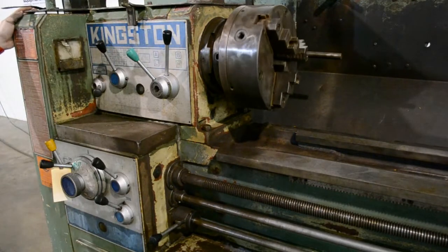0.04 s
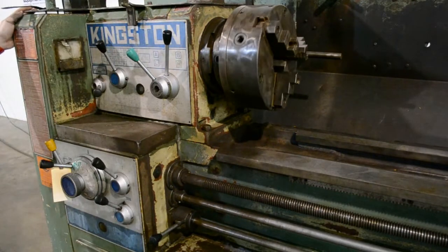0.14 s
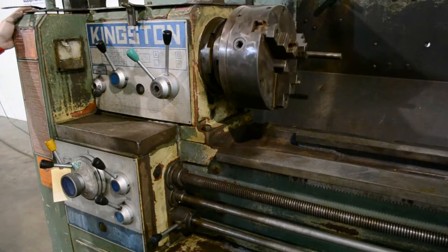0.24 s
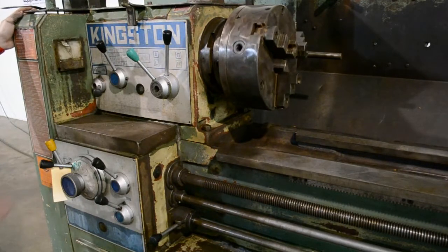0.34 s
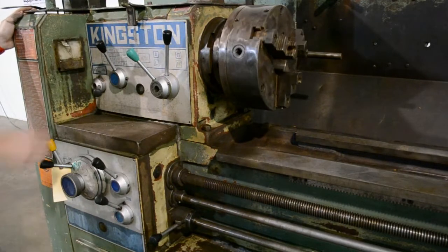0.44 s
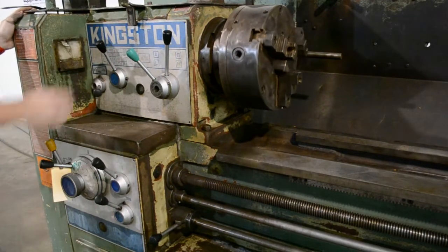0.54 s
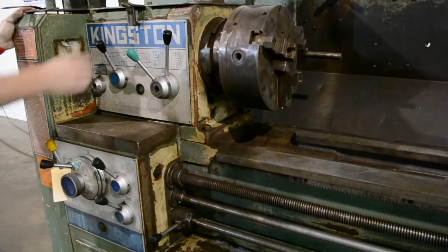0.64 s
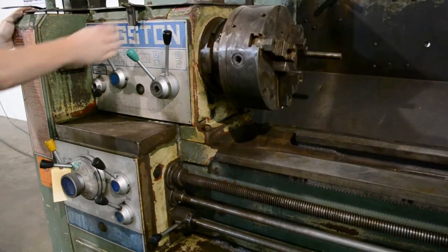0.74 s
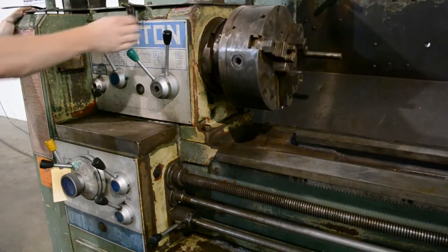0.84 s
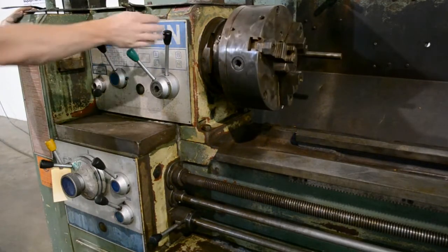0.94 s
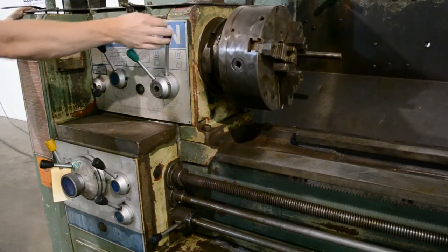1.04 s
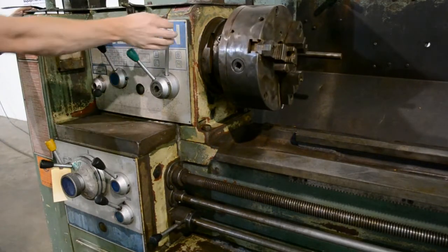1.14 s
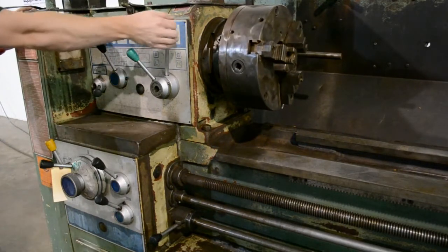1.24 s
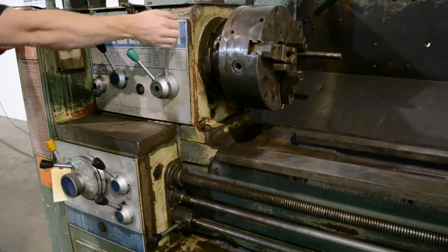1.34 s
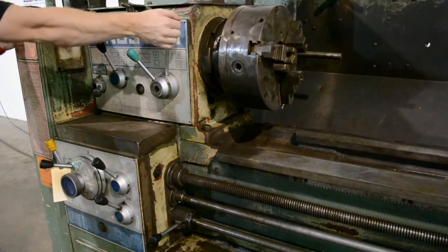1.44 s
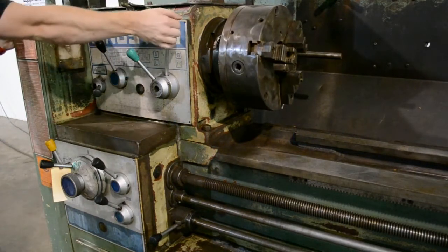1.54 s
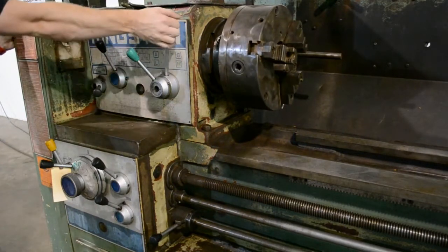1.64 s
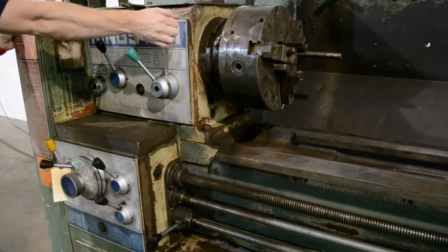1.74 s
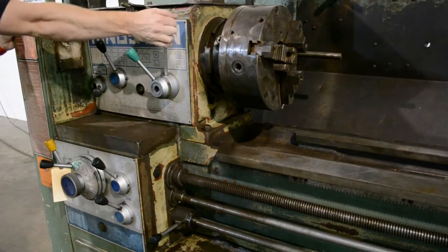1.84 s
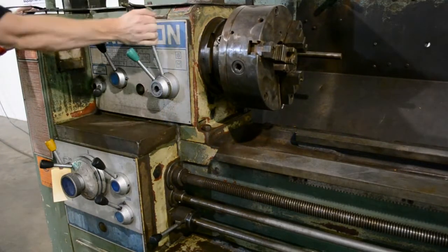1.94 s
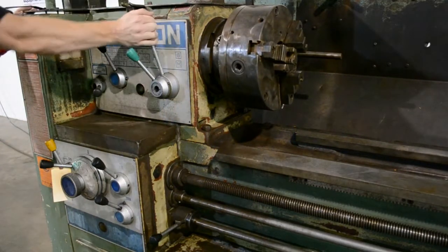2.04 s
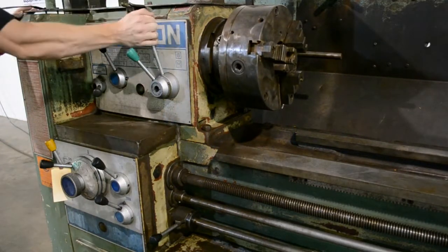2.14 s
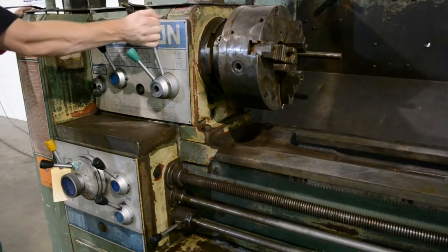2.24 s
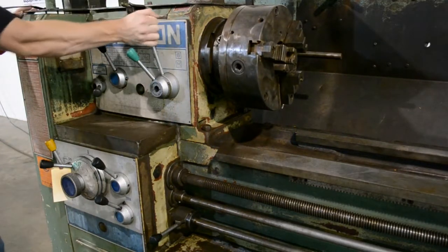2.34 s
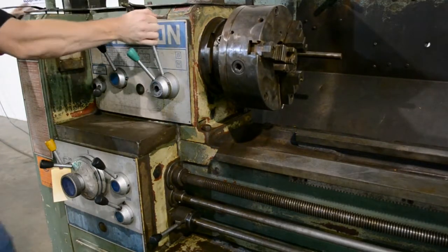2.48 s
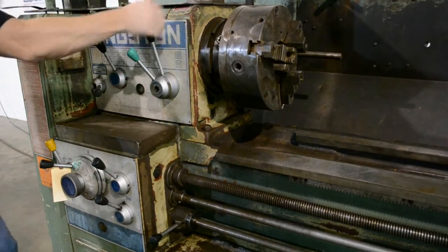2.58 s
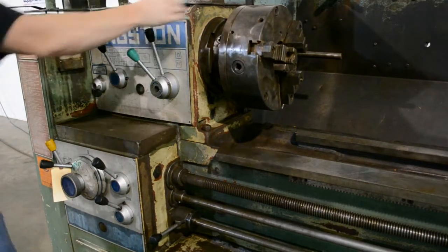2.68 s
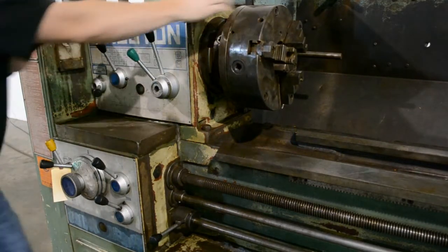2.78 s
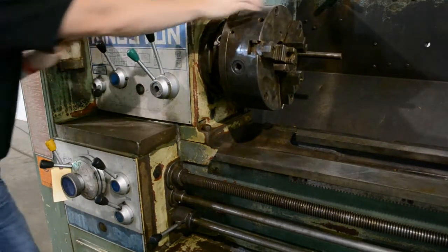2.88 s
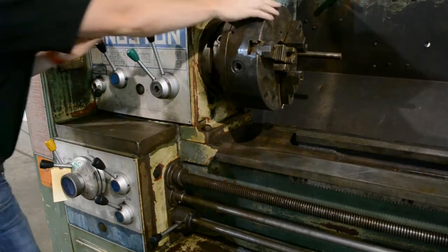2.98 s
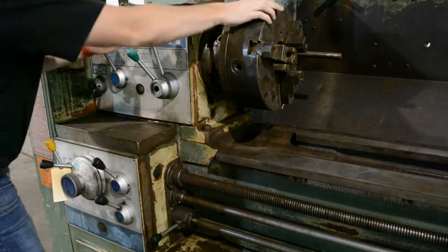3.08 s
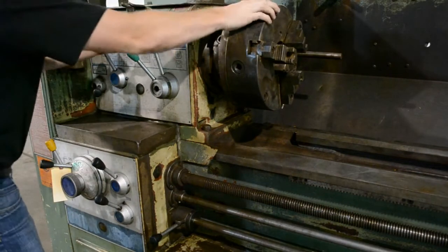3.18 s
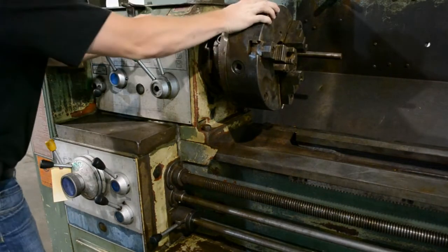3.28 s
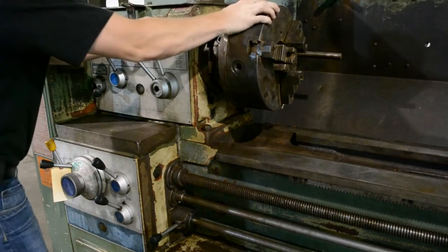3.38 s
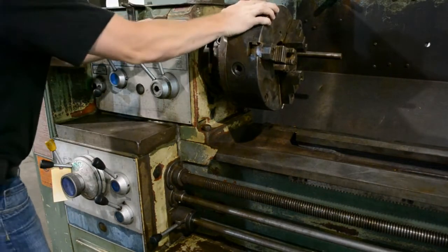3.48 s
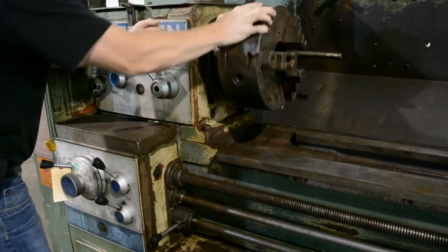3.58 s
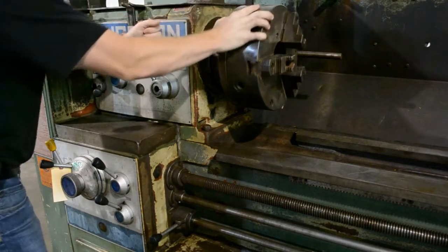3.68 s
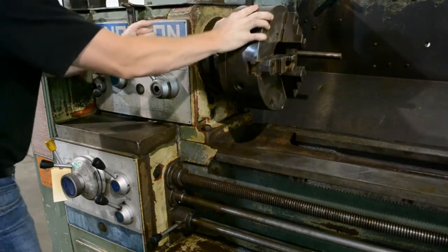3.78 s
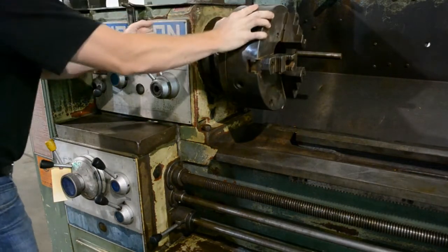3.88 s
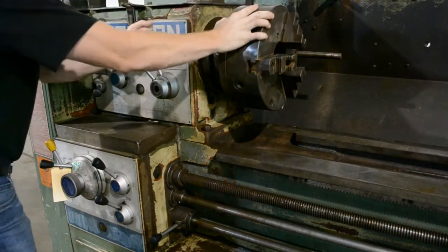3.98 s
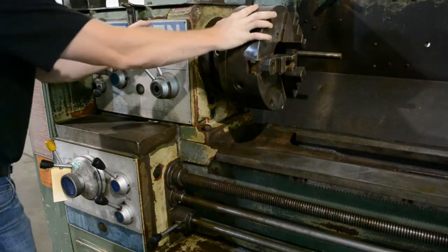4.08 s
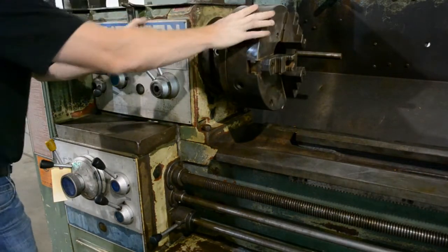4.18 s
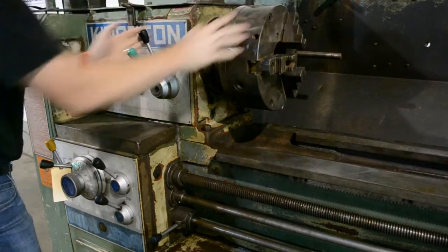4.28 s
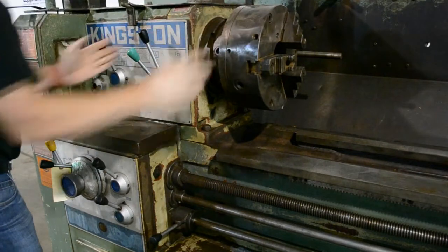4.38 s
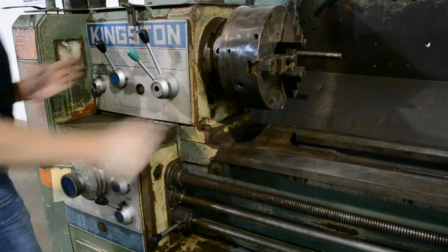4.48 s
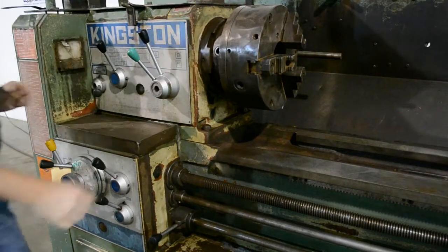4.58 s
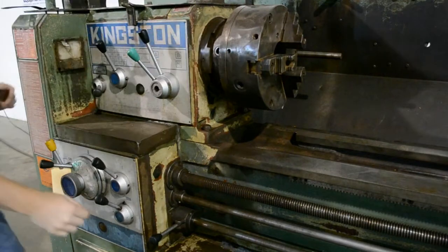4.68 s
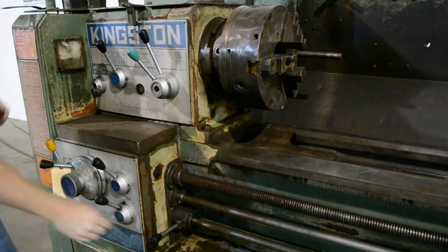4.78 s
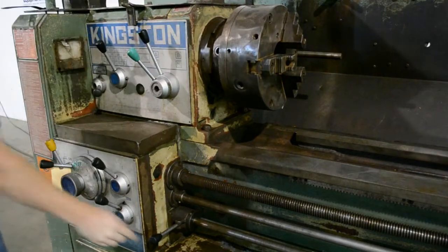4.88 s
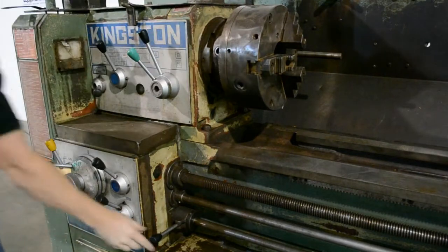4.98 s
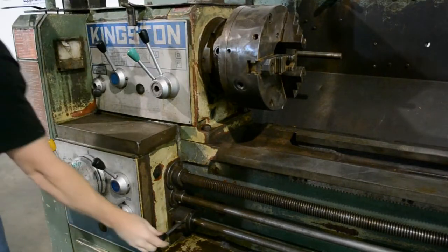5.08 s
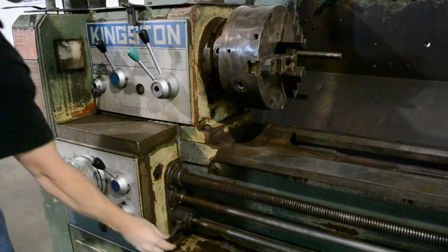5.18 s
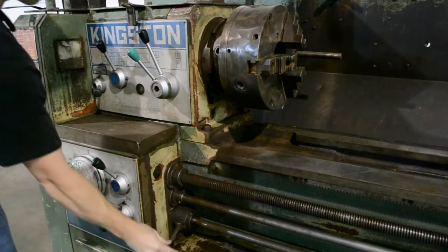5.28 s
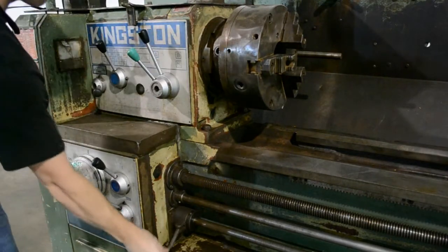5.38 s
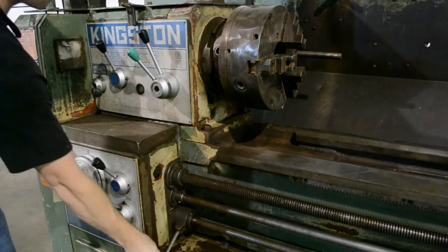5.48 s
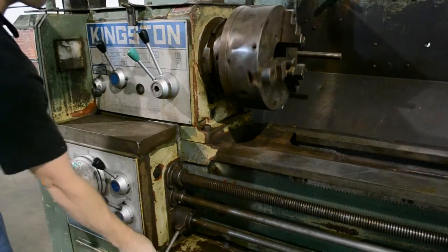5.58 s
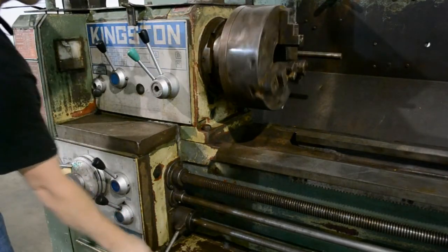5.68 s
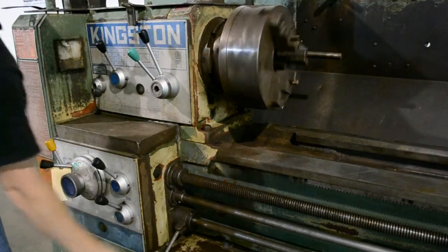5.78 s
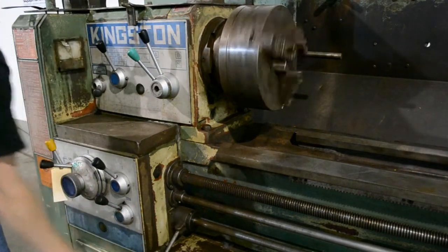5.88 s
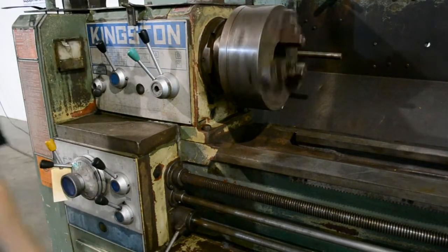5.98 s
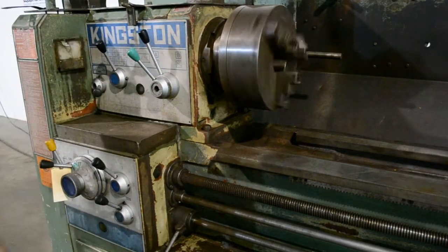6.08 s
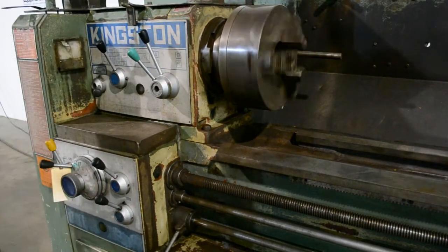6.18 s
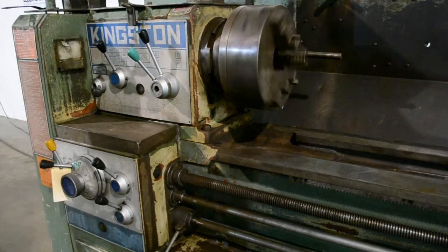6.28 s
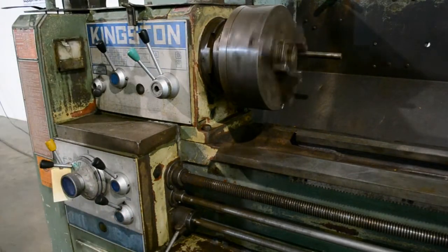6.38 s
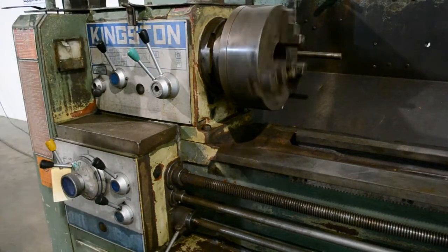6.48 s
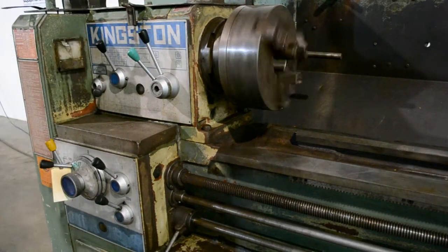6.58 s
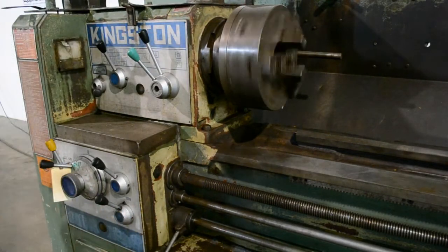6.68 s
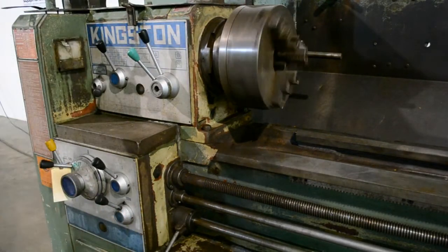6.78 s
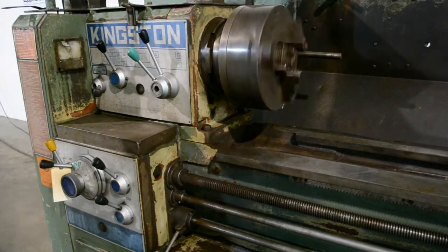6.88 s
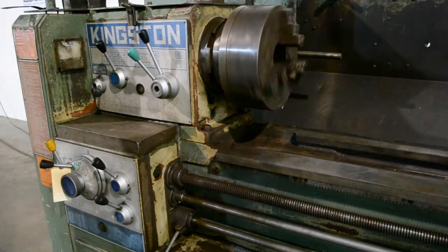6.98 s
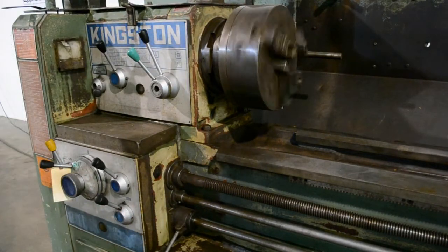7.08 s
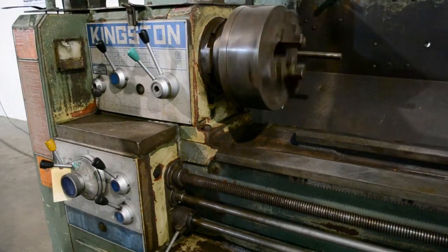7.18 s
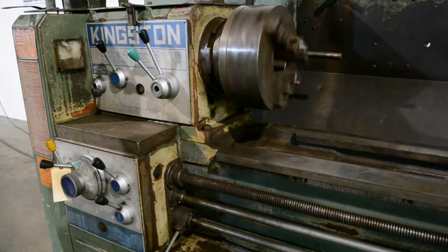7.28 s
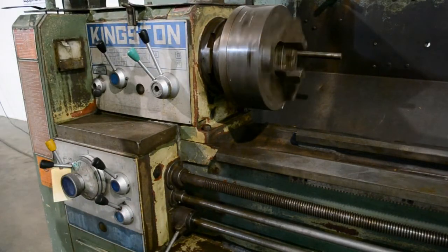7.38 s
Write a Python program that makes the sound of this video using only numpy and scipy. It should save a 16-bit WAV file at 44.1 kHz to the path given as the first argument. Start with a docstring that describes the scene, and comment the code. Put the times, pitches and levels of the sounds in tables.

```python
"""A metal lathe in a hard-walled shop, over steady ventilation. The chuck coasts to rest by 1.3 s.
A speed lever clunks over at 1.9 s. The chuck is rocked by hand until the gears drop into mesh
(3.5-3.8 s); each blow rings the iron casting. At 5.4 s the start lever is thrown: the clutch slams
in, the starting current makes the motor growl, and loaded teeth howl up to speed in half a second.
The headstock gears then whine and rattle through their backlash to the end."""
import sys
import numpy as np
from scipy import signal
from scipy.io import wavfile
from scipy.ndimage import map_coordinates

SR = 44100
rng = np.random.default_rng(int(sys.argv[2]) if len(sys.argv) > 2 else 0)


def wrap_up_sound(samples):
    """Save the sound to the file named by the first command line argument, as 16-bit audio."""
    columns = np.atleast_2d(samples).T
    # keep every value between -1 and 1, then stretch to whole-number steps
    tamed = np.clip(columns, -1, 1)
    steps = np.round(tamed * 32767).astype(np.int16)
    wavfile.write(sys.argv[1], SR, steps)


N = 327663
TIME_S = np.arange(N) / SR
EDGES_HZ = 22 * 2 ** (np.arange(29) / 3)  # third octaves
CENTRES_HZ = np.sqrt(EDGES_HZ[1:] * EDGES_HZ[:-1])
START_S, RUN_UP_S = 5.43, 0.478  # clutch bites; time to full speed

# Spectrum of tooth rasp. Each row: frequency in Hz, relative density in dB.
GEAR_RASP = [(29, -62), (50, -45), (162, -13.5), (266, -11), (373, 0.5), (417, -9.5), (585, -1),
             (840, -0.5), (898, 2), (961, -4), (1540, -2), (2020, -8.5), (2780, -11.5), (9390, -34.5),
             (11000, -54), (14300, -81), (22000, -120)]


def run_up(knee=24):
    """Speed and accelerating torque as shares of full: an even ramp that levels off at a sharp knee."""
    ramp = since(START_S) / RUN_UP_S
    speed = ramp / (1 + ramp ** knee) ** (1 / knee)
    return speed, np.gradient(speed, TIME_S) * RUN_UP_S


def driven_gears(speed, rattle_db=-36.2, jolt_db=-27.5, whine_db=-1.7, fresh_db=3.2, settle_s=0.45):
    """Rattle and whine grow with speed; the first jolt adds rattle, the whine eases as gears settle."""
    age_s = since(START_S)
    jolt = from_db(jolt_db) * swell(age_s, rise_s=0.012) * decay(age_s, t60_s=0.8)
    rattle_gain = np.hypot(jolt, from_db(rattle_db) * speed)
    fresh = np.exp(-since(START_S + RUN_UP_S) / settle_s)
    whine_gain = from_db(whine_db + fresh_db * fresh) * speed ** 1.5
    return rattle_gain * gear_rattle(speed) + whine_gain * gear_whine(speed)


def gear_rattle(speed, tooth_hz=250, shaft_hz=52, chuck_hz=4.62, clatter_db=1.5, wear_db=-18.5):
    """Teeth slap through their backlash, unevenly and in step with the shafts; the treble hisses evenly."""
    # Headstock wall resonances. Each row: frequency in Hz, width in Hz, gain in dB.
    wall_modes = [(171, 15, -7), (367, 41, 0), (603, 10, -15.5), (722, 25, -7.5), (1503, 47, 8),
                  (1687, 31, 1), (2494, 360, -5.5)]
    teeth = 1 + 0.13 * np.sin(phase(tooth_hz * speed))
    shaft = 1 + 0.062 * np.sin(phase(shaft_hz * speed))
    chuck = 1 + 0.031 * np.sin(phase(chuck_hz * speed))
    load = unit_rms(teeth * shaft * chuck * from_db(clatter_db * drift(51)))
    wear = worn_teeth(speed, shaft_hz=29.87) + worn_teeth(speed, shaft_hz=37.67)
    rasp = coloured_noise(GEAR_RASP) + from_db(wear_db) * speed * wear
    rasp = high_pass(rasp, hz=76, order=2)
    slaps = signal.sosfiltfilt(signal.butter(2, 3800, fs=SR, output="sos"), rasp)
    hiss = rasp - slaps
    return casing(slaps * load + hiss, wall_modes)


def worn_teeth(speed, shaft_hz):
    """Each tooth has its own flaws, so the same rasp comes round once a turn."""
    turns = np.cumsum(shaft_hz * speed * (1 + 0.00212 * drift(13.5))) / SR
    rasp = from_db(at_hz(GEAR_RASP, CENTRES_HZ)) @ noise_bands(SR // 8)
    return unit_rms(map_coordinates(rasp, [turns % 1 * SR / shaft_hz], order=3))


def casing(x, modes):
    """The headstock walls lift their resonances out of the gear noise; rms 1."""
    return unit_rms(x + sum(from_db(db) * resonance(x, hz, width_hz) for hz, width_hz, db in modes))


def gear_whine(speed, flutter=0.0012, waver_db=0.5):
    """Mesh tones follow the speed; each wavers as the tooth load shifts."""
    # Gear mesh tones. Each row: frequency at full speed in Hz, relative level in dB.
    mesh_tones = [(166.9, -61.5), (376.8, -53), (597.5, -48), (753.7, -52), (780.6, -52), (894, -41),
                  (1077, -52), (1130, -52), (1195, -47), (1254, -50), (1351, -52.5), (1480, -51),
                  (1577, -48.5), (1690, -55), (1803, -59), (1933, -56), (2116, -61.5), (2148, -59.5),
                  (2320, -61), (2390, -55.5), (2482, -61), (2595, -65), (2724, -57.5), (2842, -58.5),
                  (3300, -67)]
    shaft_speed = speed * (1 + flutter * drift(5.2))
    whine = np.zeros(N)
    for hz, db in mesh_tones:
        amplitude = np.sqrt(2) * from_db(db + waver_db * drift(15))
        whine += amplitude * np.sin(phase(hz * shaft_speed * (1 + flutter * drift(24))))
    return whine


def strained_mesh(speed, torque, gain_db=-31.8, surge_db=2.5, roughness=0.016):
    """Teeth under torque howl in a rough rising glide that booms as it crosses a casing resonance."""
    # Each row: frequency at full speed in Hz, relative level in dB.
    meshes = [(894, -17), (1195, -6), (1270, -1), (1351, -6), (2390, -23), (2724, -15), (2917, -16)]
    tones = sum(from_db(db) * np.sin(phase(hz * speed * (1 + roughness * drift(42))))
                for hz, db in meshes)
    howl = from_db(gain_db + surge_db * drift(20)) * torque * speed ** 1.1 * tones
    howl = high_pass(howl, hz=340, order=4)
    howl += from_db(5) * resonance(howl, hz=385, width_hz=70)
    return howl + from_db(-9) * shop_echo(howl)


def motor_growl(gain_db=-31.3, hold_s=0.35, waver_db=2.6, shudder_db=-10):
    """The starting current shakes the motor at multiples of the mains frequency."""
    # Mains harmonics. Each row: frequency in Hz, relative level in dB.
    harmonics = [(120, -31), (240, -19.5), (360, 0), (600, -24), (720, -20.5)]
    hum = sum(from_db(db + waver_db * drift(14)) * np.sin(phase(np.full(N, hz))) for hz, db in harmonics)
    shudder = coloured_noise([(50, -14), (130, -22), (300, 16), (450, 14), (800, -20), (3000, -58)])
    current = swell(since(START_S), rise_s=0.011) * decay(since(START_S + hold_s), t60_s=0.9)
    return from_db(gain_db) * current * (unit_rms(hum) + from_db(shudder_db) * shudder)


def contacts(rebound_s=0.017):
    """All contacts, in rows laid out like those of the clutch slams."""
    # The clutch slams in and the gears take up slack. Each row: start in seconds, level in dB,
    # bass in dB, treble in dB, t60 in seconds, struck part's note in Hz, note level in dB.
    slams = [(5.4226, -32.5, -4, 13, 0.2, 2390, -19), (5.4285, -16.8, -37, -13, 0.079, 630, 1),
             (5.447, -17.5, -16, -6, 0.059, 1590, -1), (5.4775, -13.5, -29, -18, 0.033, 1530, 1),
             (5.487, -27, -10, -8, .06, 1270, -3)]
    # Gears drop into mesh. Each row: as for the slams, then rebound level in dB.
    shifts = [(1.9243, -8, -6, -4.5, .033, 1264, 2, -21.5), (3.5535, -38, -8, -28, .13, 591, 3, -43),
              (3.637, -29, -14, -11, .07, 1200, -8, -37.5), (3.708, -21, -15, -11, .1, 1035, -5.5, -32.5),
              (3.785, -17.5, -8, -24, .078, 1046, -1.5, -27)]
    # Light, dull knocks of gears, lever and hand. Each row: start in seconds, level in dB, note in Hz.
    knocks = [(.197, -45.5, 1290), (.2885, -43, 1330), (.521, -50, 1320), (.759, -51, 1510),
              (1.302, -50.5, 1254), (1.345, -56, 600), (1.582, -53.5, 1490), (3.966, -39, 1255),
              (4.784, -53, 300)]
    # Handles click. Each row: start in seconds, level in dB, treble in dB.
    clicks = [(1.817, -50, 12), (2.783, -57, 18), (3.414, -60, 24), (5.096, -35, 0), (5.121, -58, 28),
              (5.208, -53, 1), (5.275, -46.5, 19)]
    rows = [shift[:-1] for shift in shifts]
    # each shift rebounds, deeper and longer
    rows += [(start_s + rebound_s, rebound_db, bass_db + 11, treble_db - 11, 2.6 * t60_s, 592, 1)
             for start_s, _, bass_db, treble_db, t60_s, _, _, rebound_db in shifts]
    rows += slams
    rows += [(start_s, db, -7, -21, 0.07, note_hz, 2) for start_s, db, note_hz in knocks]
    rows += [(start_s, db, -30, treble_db, 0.028, 1850, 1) for start_s, db, treble_db in clicks]
    return rows


def blows(spread_s=0.0012, room_db=-10.5):
    """Each contact wakes the casting's dense, short-lived modes, its ring and the shop."""
    # Spectrum of a blow on the casting. Each row: frequency in Hz, relative density in dB.
    clunk_spectrum = [(80, -30.5), (160, -14), (300, -5), (550, 0.5), (1100, -2.5), (1800, -6),
                      (2600, -5.5), (4500, -11), (7000, -14.5), (11000, -23)]
    track = np.zeros(N + 2 * SR)
    age_s = TIME_S[:SR // 2]
    bands, tails = noise_bands(SR), shop_tails(TIME_S[:2 * SR])
    bass = np.clip(np.log2(800 / CENTRES_HZ) / 2, 0, 1)
    treble = np.clip(np.log2(CENTRES_HZ / 1300) / 2, 0, 1)
    for start_s, db, bass_db, treble_db, t60_s, note_hz, note_db in contacts():
        colour = from_db(at_hz(clunk_spectrum, CENTRES_HZ) + bass_db * bass + treble_db * treble)
        colour /= (colour @ bands).std()
        offset, onset = rng.integers(SR // 2), round(start_s * SR)
        band_t60_s = t60_s * (1000 / CENTRES_HZ[:, None]) ** 0.13  # low modes last longer
        clunk = colour @ (bands[:, offset:offset + len(age_s)] * decay(age_s, band_t60_s))
        ring = iron_ring(age_s, bass_db, note=(note_hz, note_db, 1.09 * t60_s))
        track[onset:onset + len(age_s)] += from_db(db) * (clunk + ring) * swell(age_s, spread_s)
        echo = np.sqrt(t60_s) * (colour @ tails)  # a longer blow feeds the room more
        track[onset:onset + len(echo)] += from_db(db + room_db) * echo
    return track[:N]


def iron_ring(age_s, bass_db, note, gain_db=-2.5):
    """The casting rings on with the struck part's note; taps with little bass hardly move the iron."""
    # Casting modes. Each row: frequency in Hz, relative level in dB, t60 in seconds.
    iron_modes = [(135, -38, 1.3), (250, -29, 1), (275.3, -32.5, .7), (345, -22, .6), (405, -22, .4),
                  (479, -50, 0.39), (509.5, -24, 0.61), (590.4, -18.5, 0.56), (1487, -15, 0.18),
                  (2490, -10, .06)]
    modes = [(hz, gain_db + db + bass_db / 2 + 2 * rng.normal(), t60_s) for hz, db, t60_s in iron_modes]
    return sum(from_db(db) * decay(age_s, t60_s) * np.sin(2 * np.pi * (hz * age_s + rng.random()))
               for hz, db, t60_s in [*modes, note])


def rubs(grain_db=2.3, echo_db=-8.5):
    """Levers, hand and sleeve slide: grainy friction swells and fades, with a trace in the room."""
    # Strokes. Each row: peak time in seconds, level in dB, 60 dB rise and 60 dB fall in seconds.
    strokes = [(1.92, -45.5, .3, .06), (2.5, -58.5, .55, .45), (2.662, -49.5, .013, .15),
               (2.88, -72, 1.5, 1.6), (3.762, -40, .06, .07), (4.08, -55.5, .5, 1.4), (4.66, -65, .5, .2),
               (4.7855, -52, .011, .14), (4.833, -48, .2, .14), (5.418, -54, .06, .05)]
    # Friction spectrum. Each row: frequency in Hz, relative density in dB.
    rub_spectrum = [(200, -1), (1000, -0.5), (2200, 8.5), (4000, 6), (7000, 1.5), (11000, -4)]
    pressure = np.zeros(N)
    for peak_s, db, rise_s, fall_s in strokes:
        until_s = np.maximum(peak_s - TIME_S, 0)
        pressure += from_db(db) * decay(until_s, rise_s) * decay(since(peak_s), fall_s)
    friction = pressure * from_db(grain_db * drift(120)) * coloured_noise(rub_spectrum)
    return friction + from_db(echo_db) * shop_echo(friction)


def coasting_gears(gain_db=-48.7, stop_s=1.3):
    """The unloaded gears fade as friction slows the chuck evenly."""
    # Unloaded gear noise. Each row: frequency in Hz, relative density in dB.
    coast_spectrum = [(200, -13.5), (300, -15), (450, -5), (900, -2.5), (1600, -3.5), (2700, -9),
                      (6500, -35), (10000, -54)]
    # Resonances it wakes. Each row: frequency in Hz, width in Hz, gain in dB.
    idle_modes = [(377.4, 13, 17), (594, 33, -0.5), (800, 17, 5.5), (1520, 29, 7), (1640, 90, 1.5),
                  (2380, 93, -8)]
    speed = np.maximum(1 - TIME_S / stop_s, 0)
    return from_db(gain_db) * speed ** 1.05 * casing(coloured_noise(coast_spectrum), idle_modes)


def shop_echo(x):
    """Reverberation of x, at about the same power."""
    tail = shop_tails(TIME_S[:SR]).sum(axis=0)
    return signal.fftconvolve(x, tail / np.linalg.norm(tail))[:N]


def shop_tails(age_s):
    """Diffuse reflections by band: they build up, then die away."""
    # Reverberation times. Each row: frequency in Hz, t60 in seconds.
    reverb_times = [(100, 2.65), (250, 1.45), (600, 0.99), (1200, 1.04), (2600, 1.37), (5000, 1.26),
                    (10000, 1.4)]
    # Wall colour. Each row: frequency in Hz, gain in dB.
    walls = [(100, 10), (250, 8), (600, 4), (1200, 3), (3000, 4), (6000, -4), (10000, -12)]
    envelope = decay(age_s, at_hz(reverb_times, CENTRES_HZ)[:, None]) * swell(age_s, rise_s=0.001)
    return from_db(at_hz(walls, CENTRES_HZ))[:, None] * noise_bands(len(age_s)) * envelope


def ventilation(gain_db=-59.5):
    """A steady, low rush of air."""
    # Air noise. Each row: frequency in Hz, relative density in dB.
    air_spectrum = [(15, -62), (25, -36), (64, 0), (99, -7), (229, -4), (296, -9), (344, -5.5), (798, -7.5),
                    (907, -10.5), (1080, -5.5), (2580, -12.5), (9680, -33.5), (11000, -43.5), (14300, -69),
                    (22000, -120)]
    return from_db(gain_db) * coloured_noise(air_spectrum)


def from_db(db):
    """Decibels to gain."""
    return 10 ** (np.asarray(db) / 20)


def unit_rms(x):
    """Scale to rms 1."""
    return x / np.sqrt(np.mean(x ** 2) + 1e-20)


def at_hz(points, hz):
    """Interpolate a table along log frequency."""
    points_hz, values = np.transpose(points)
    return np.interp(np.log(hz), np.log(points_hz), values)


def since(start_s):
    """Seconds since start_s, zero before it."""
    return np.maximum(TIME_S - start_s, 0)


def swell(age_s, rise_s):
    """Smooth rise from 0 to 1."""
    return (1 - np.exp(-age_s / rise_s)) ** 2


def decay(age_s, t60_s):
    """Exponential fall, 60 dB down at t60_s."""
    return np.exp(-np.log(1000) * age_s / t60_s)


def phase(hz):
    """Radians turned at a changing rate, from a random start."""
    return 2 * np.pi * (np.cumsum(hz) / SR + rng.random())


def drift(rate_hz, hop=40):
    """Slow random wander, rms about 1."""
    pole = np.exp(-2 * np.pi * rate_hz * hop / SR)
    white = rng.standard_normal(N // hop + 2002)
    slow = signal.lfilter([1], [1, -2 * pole, pole * pole], white)[2000:]
    return np.interp(np.arange(N) / hop, np.arange(len(slow)), unit_rms(slow))


def noise_bands(size):
    """White noise in third octaves, neighbours unrelated."""
    white = rng.standard_normal((2, size + SR // 4))
    filters = [signal.butter(2, edges_hz, "band", fs=SR, output="sos")
               for edges_hz in zip(EDGES_HZ, EDGES_HZ[1:])]
    return np.array([signal.sosfilt(sos, white[k % 2])[-size:] for k, sos in enumerate(filters)])


def coloured_noise(spectrum):
    """Steady noise shaped by (Hz, dB) points, rms 1."""
    return unit_rms(from_db(at_hz(spectrum, CENTRES_HZ)) @ noise_bands(N))


def resonance(x, hz, width_hz):
    """Two-pole band-pass, peak gain 1."""
    radius = np.exp(-np.pi * width_hz / SR)
    feedback = [1, -2 * radius * np.cos(2 * np.pi * hz / SR), radius ** 2]
    return signal.lfilter(np.array([1, 0, -1]) * (1 - radius ** 2) / 2, feedback, x)


def high_pass(x, hz, order):
    """Cut below hz."""
    return signal.sosfilt(signal.butter(order, hz, "high", fs=SR, output="sos"), x)


def scene():
    """The driven lathe, handling noises, coasting gears and ventilation, in mono."""
    speed, torque = run_up()
    running = driven_gears(speed) + strained_mesh(speed, torque) + motor_growl()
    return (running + blows() + rubs() + coasting_gears() + ventilation())[None]


def record(dry, low_cut_hz=42, top_cut_hz=10750):
    """The microphone loses the deep bass and has a dip and a peak in the treble; the top is cut."""
    dip = 0.55 * resonance(dry, hz=7950, width_hz=900)
    peak = from_db(-8.5) * resonance(dry, hz=9400, width_hz=1300)
    voiced = high_pass(dry - dip + peak, low_cut_hz, order=3)
    return signal.sosfilt(signal.butter(32, top_cut_hz, fs=SR, output="sos"), voiced)


dry = scene()
out = record(dry)
wrap_up_sound(out)
```